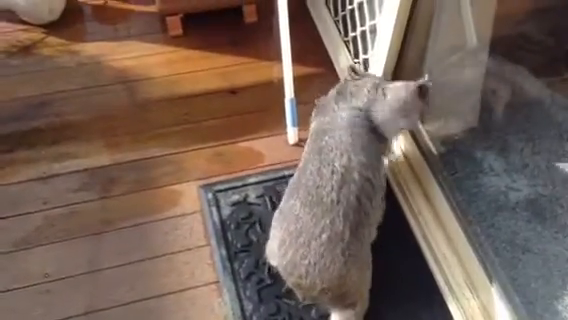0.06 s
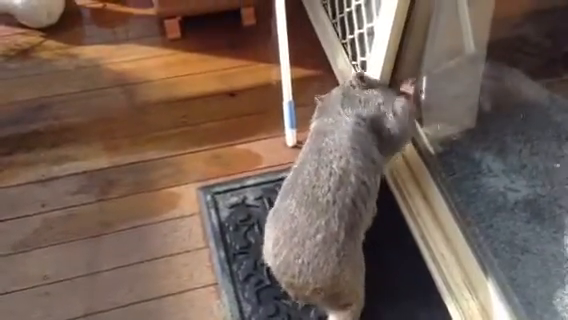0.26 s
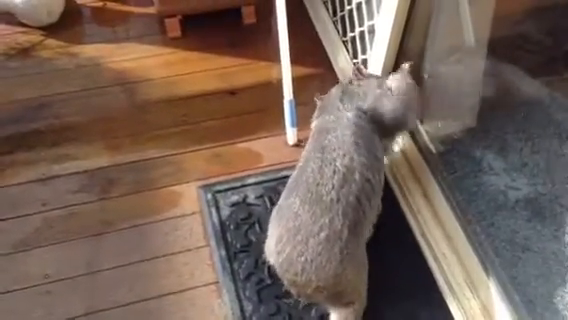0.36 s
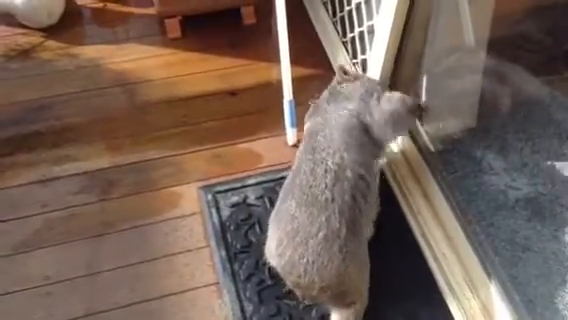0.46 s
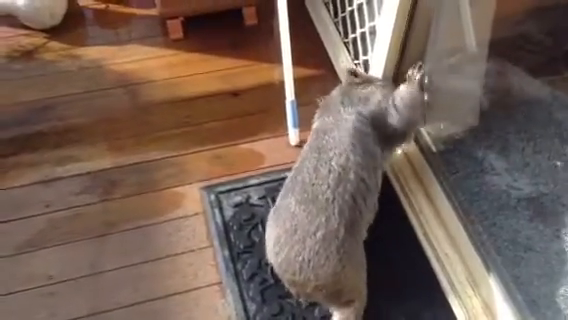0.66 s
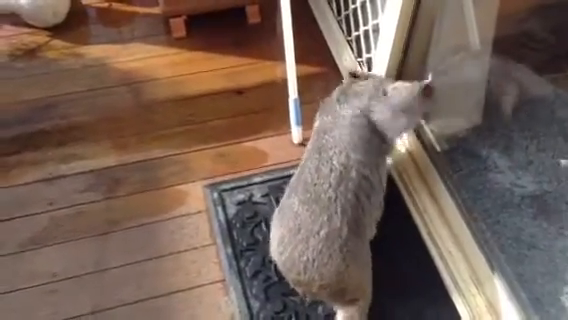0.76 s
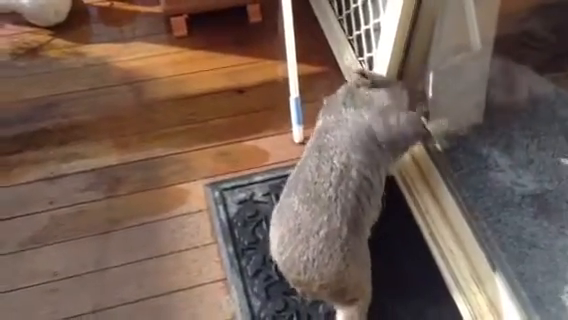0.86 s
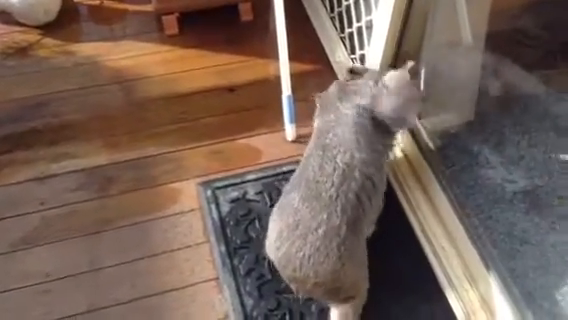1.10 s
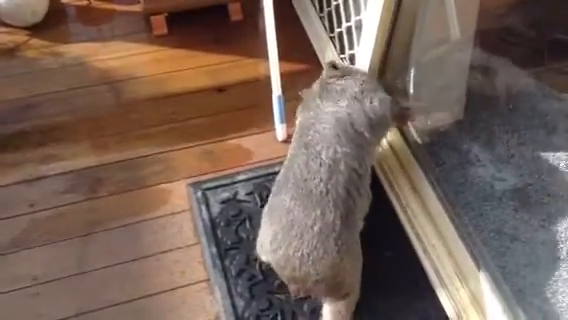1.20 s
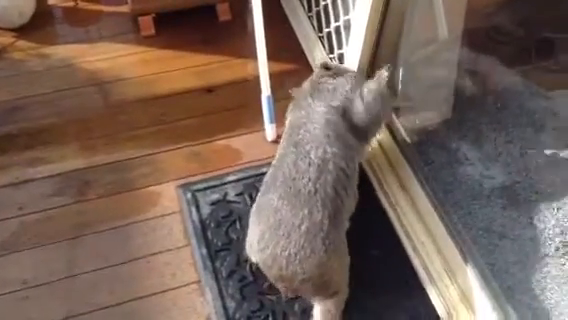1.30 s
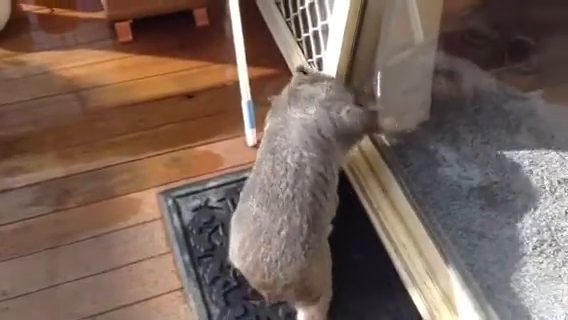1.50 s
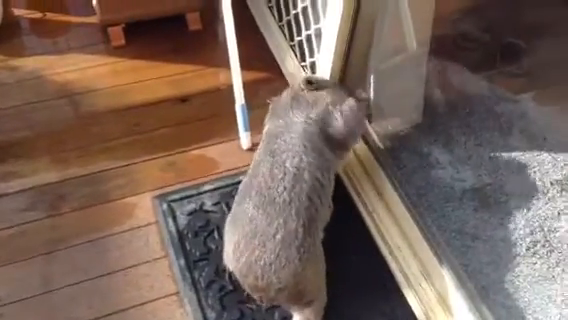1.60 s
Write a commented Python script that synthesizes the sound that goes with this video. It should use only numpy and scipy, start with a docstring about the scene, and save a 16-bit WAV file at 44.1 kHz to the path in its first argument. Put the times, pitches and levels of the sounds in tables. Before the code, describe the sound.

An animal's claws tick and scuff against a sliding door on a verandah. Dull bumps and low rumble, like wind on the microphone, come early. One scrape turns into a short shrill squeak, then more clicks follow over faint hiss.

```python
"""On a wooden verandah, a wombat paws at a sliding door. Claw impacts excite the frame's modes as ticks,
sliding friction scrapes, and one hard stroke breaks into stick-slip oscillation: a short, shrill squeak
that the verandah reflects. Dull, dry bumps and a low rumble, probably turbulent air buffeting the
microphone, come and go over faint outdoor hiss."""
import sys
import numpy as np
from scipy import signal
from scipy.fft import rfft, irfft
from scipy.io import wavfile

SR = 44100
rng = np.random.default_rng(int(sys.argv[2]) if len(sys.argv) > 2 else 0)


def digitize_waveform(pressure):
    """Quantize a signal to 16-bit integers and store it at the path in sys.argv[1].

    Rows of a 2-D input are taken as channels; values are limited to [-1, 1].
    """
    field = np.atleast_2d(pressure).T
    bounded = np.clip(field, -1, 1)
    quanta = np.round(bounded * 32767).astype(np.int16)
    wavfile.write(sys.argv[1], SR, quanta)


N = 72765
TIME, FREQ_HZ = np.arange(N) / SR, np.fft.rfftfreq(N, 1 / SR)


def amp(db):
    """Amplitude ratio: tenfold for every 20 dB."""
    return 10 ** (np.asarray(db) / 20)


def unit(x):
    """Normalisation to an rms of one."""
    return x / np.sqrt(np.mean(x ** 2) + 1e-20)


def read(points, hz):
    """Interpolation on a logarithmic frequency axis."""
    point_hz, value = np.transpose(points)
    return np.interp(np.log(hz + 1), np.log(point_hz + 1), value)


def add(mix, start_s, sound):
    """Superposition of a delayed sound on the mix."""
    part = mix[max(round(start_s * SR), 0):][:len(sound)]
    part += sound[:len(part)]


def colour(x, spectrum, tilt_db=0, size=2048):
    """Minimum-phase filtering at unit energy; the spectrum tilts by tilt_db per octave."""
    hz = abs(np.fft.fftfreq(size, 1 / SR))
    gain = amp(read(spectrum, hz) + tilt_db * np.log2(np.maximum(hz, spectrum[0][0])))
    response = np.exp(signal.hilbert(np.log(gain)).conj())
    taps = np.fft.ifft(response).real[:size // 2]
    return signal.fftconvolve(x, taps / np.linalg.norm(taps))


def noise(spectrum):
    """Spectral shaping of white noise."""
    return unit(irfft(rfft(rng.standard_normal(N)) * amp(read(spectrum, FREQ_HZ)), N))


def wander(hz):
    """Low-pass random fluctuation up to about hz."""
    return unit(irfft(rfft(rng.standard_normal(N)) * np.exp(-(FREQ_HZ / hz) ** 2), N))


# claw impacts on the door: start_s, level_db, tilt_db_per_octave, ping_hz
CLAW_STRIKES = [(0.0511, -33.5, 4, 3640), (0.0616, -38.5, 0, 4150), (0.0638, -44, -2, 3630),
                (.0753, -39.5, 3, 3500), (0.1898, -39, -0.5, 4000), (.197, -43, 12, 2550),
                (0.4155, -41, 6, 4980), (0.414, -31, -0.5, 3540), (0.434, -39, 1, 3560),
                (0.454, -46.5, -1, 4100), (.583, -48.5, 2.5, 4000), (0.765, -30, 0.5, 5040),
                (0.7678, -32, 3, 3710), (0.771, -31.5, -2, 2480), (.7875, -42.5, 21, 3600),
                (.8055, -42, 4, 3640), (.899, -43.5, -3, 3440), (1.046, -41.5, -3.5, 3860),
                (1.0523, -38.5, 0, 3320), (1.1095, -33.5, 0.5, 5090), (1.1128, -38, -1, 3510),
                (1.117, -40.5, 2, 2500), (1.1262, -41.5, 4, 3700), (1.139, -41.5, 2, 3720),
                (1.19, -46, 6.5, 2340), (1.245, -35.5, -0.5, 3860), (1.254, -44, -4, 2670),
                (1.2945, -47.5, 5, 3680), (1.4492, -21.5, 0, 3226), (1.4550, -29, -6.5, 2510),
                (1.4648, -58, 1, 3700), (1.507, -42.5, -5, 2230), (1.522, -47, -8, 3300),
                (1.536, -53, 5, 3200), (1.5605, -43, -6.5, 2300), (1.6042, -56, 3, 4000)]
# spectrum of claw or paw contact: frequency_hz, level_db
CONTACT_SPECTRUM = [(50, -51), (200, -25.5), (600, -11.5), (1000, -3), (1400, -12.5), (2000, -2),
                    (2600, -3), (3000, -1.5), (3600, 1.5), (4500, -3), (6500, -9), (9000, -13.5),
                    (13000, -21.5), (15500, -25.5)]
# normal modes of the frame: frequency_hz, level_db, t60_s
FRAME_MODES = [(2407, -12.5, 0.055), (2660, -14.5, 0.063), (3460, -9.5, .02), (3660, -8, 0.013)]


def claw_ticks(gain_db=2.5, grit_fade_s=0.00081, ping_db=-2, ping_t60_s=0.012, frame_db=-8):
    """Impact excitation: each gritty contact starts a local ping and the frame's damped modes."""
    out, t = np.zeros(N), np.arange(SR // 16) / SR
    for start_s, level_db, tilt_db, ping_hz in CLAW_STRIKES:
        grit = rng.choice([-1., 1.], len(t)) * np.exp(-t / grit_fade_s)
        tick = colour(grit, CONTACT_SPECTRUM, tilt_db)[:len(t)]
        ping = amp(ping_db - 60 * t / ping_t60_s) * np.sin(2 * np.pi * ping_hz * t)
        frame = sum(amp(db - 60 * t / t60_s) * np.sin(2 * np.pi * (hz * t + rng.random()))
                    for hz, db, t60_s in FRAME_MODES)
        add(out, start_s, amp(level_db + gain_db) * (tick + ping + amp(frame_db) * frame))
    return out


def stick_slip(envelope, harmonics_db, first_hz, settled_hz, settle_s, jitter, flutter=0.4):
    """Self-excited friction oscillation: the tone glides onto its mode and is roughest when loud."""
    time_s, level_db = np.transpose(envelope)
    level = amp(np.interp(TIME, time_s, level_db))
    roughness = (level / level.max()) ** 0.27
    age = np.maximum(TIME - time_s[0], 0)
    pitch_hz = settled_hz + (first_hz - settled_hz) * np.exp(-age / settle_s)
    cycles = np.cumsum(pitch_hz * (1 + jitter * roughness * wander(hz=500))) / SR
    tone = sum(amp(db) * np.sin(2 * np.pi * k * cycles) for k, db in enumerate(harmonics_db, 1))
    sounding = (TIME > time_s[0]) & (TIME < time_s[-1])
    return tone * level * sounding * (1 + flutter * roughness * wander(hz=500))


# envelope of the main squeak: time_s, level_db
SQUEAK_ENVELOPE = [(.646, -55), (.65, -48), (.661, -54), (.665, -21.5), (.675, -25.5), (.682, -32),
                   (.695, -52), (.71, -44), (.735, -54), (.762, -52)]
# its harmonics, from the fundamental up: level_db
SQUEAK_HARMONICS = [1.5, -2, -14.5, -22]
# envelope of the higher mode: time_s, level_db
WHISTLE_ENVELOPE = [(.646, -31), (.649, -24), (.654, -29.5), (.659, -24), (.666, -40), (.68, -38),
                    (.70, -59), (.76, -60), (.85, -70)]


def squeak():
    """Stick-slip of a claw drives two modes; the higher one peaks first."""
    main = stick_slip(SQUEAK_ENVELOPE, SQUEAK_HARMONICS,
                      first_hz=3640, settled_hz=3460, settle_s=0.018, jitter=0.019)
    whistle = stick_slip(WHISTLE_ENVELOPE, [0],
                         first_hz=7750, settled_hz=8100, settle_s=0.004, jitter=0.009)
    return main + whistle


# spectrum of the hard stroke: frequency_hz, level_db
SCRAPE_SPECTRUM = [(200, -2), (600, -3.5), (1150, 3), (1500, -4), (2100, -5.5), (2700, 1), (3600, -10),
                   (4600, -14.5), (6000, -10.5), (8000, -18), (11000, -20.5), (15000, -31)]


def scrape(start_s=0.6236, level_db=-23, impact_fade_s=0.0056, drag_db=-15.5, drag_s=0.061):
    """Impact, then sliding friction: the paw lands hard and drags into the squeak."""
    out, t = np.zeros(N), np.arange(SR // 5) / SR
    envelope = np.exp(-t / impact_fade_s) + amp(drag_db) * np.exp(-(t / drag_s) ** 2)
    add(out, start_s, amp(level_db) * colour(envelope * rng.standard_normal(len(t)), SCRAPE_SPECTRUM))
    return out


# paw slides along the door: start_s, rise_s, fade_s, level_db
PAW_SLIDES = [(.125, 0.011, 0.069, -59), (0.51, 0.0085, 0.048, -53), (.6, 0.011, 0.023, -54.5),
              (1.218, 0.0095, 0.032, -55.5), (1.515, 0.024, 0.033, -62.5)]


def paw_rubs():
    """Light sliding friction radiates soft swells of noise."""
    envelope = np.zeros(N)
    for start_s, rise_s, fade_s, level_db in PAW_SLIDES:
        rise = np.clip((TIME - start_s) / rise_s, 0, 1)
        fade = np.exp(-np.maximum(TIME - start_s - rise_s, 0) / fade_s)
        envelope += amp(level_db) * rise * fade
    return envelope * noise(CONTACT_SPECTRUM)


# reverberation time under the roof: frequency_hz, t60_s
VERANDAH_DECAY = [(300, 0.16), (1500, 0.26), (3500, .32), (8000, 0.33), (15000, 0.48)]


def verandah(x, early_db=-1.5, early_fade_s=0.011, tail_db=-8):
    """Reverberation: early reflections from deck and wall, then a short diffuse tail."""
    t = np.arange(SR // 2) / SR
    signs = rng.choice([-1., 1.], (2, len(t)))
    arrivals = (rng.random((2, len(t))) < 0.08) & (t > 0.002)  # sparse, after a 2 ms gap
    early_taps, tail_taps = signs * arrivals
    early = early_taps * np.exp(-t / early_fade_s)
    hz, age, bands = signal.stft(tail_taps, SR, nperseg=256)
    decay = amp(-60 * age / read(VERANDAH_DECAY, hz)[:, None])
    tail = signal.istft(bands * decay, SR, nperseg=256)[1][:len(t)]
    response = amp(early_db) * early / np.linalg.norm(early) + amp(tail_db) * tail / np.linalg.norm(tail)
    return signal.fftconvolve(x, response)[:N]


# pressure pulses of the air: centre_s, level_db, pitch_hz
AIR_PULSES = [(0.0904, -26.5, 167), (0.1107, -31.5, 252), (0.198, -27.5, 353), (0.2167, -12, 197),
              (0.2492, -11.5, 523), (.2630, 0.5, 400), (0.275, -33, 292), (.288, -16, 247),
              (.305, -17.5, 475), (0.3242, -9.5, 236), (.329, -4.5, 453), (0.3325, -2, 328),
              (0.3649, -14.5, 750), (0.368, -7.5, 395), (0.3839, -11, 268), (.3933, -9, 249),
              (0.4047, -15.5, 254), (0.4077, -17.5, 660), (.412, -7.5, 248), (0.425, -23, 240),
              (.436, -16.5, 275), (0.4756, -14.5, 197), (0.4964, -13.5, 266), (.5392, -25.5, 490),
              (0.5439, -12.5, 218), (0.603, -18.5, 253), (0.6366, -16, 245), (0.645, -16.5, 210),
              (0.6607, -9, 298), (0.6709, -10, 239), (0.6874, -3.5, 290), (.695, -10, 380),
              (0.7108, -8, 340), (0.715, -15.5, 556), (0.7227, -9.5, 246), (0.7476, -22, 398),
              (0.7571, -12.5, 307), (0.7672, -6, 199), (0.9329, -24.5, 245), (0.9542, -23.5, 240),
              (0.9892, -26, 200), (1.1512, -22, 148), (1.1871, -20, 251)]


def air_bumps(gain_db=-0.5, width_cycles=0.29, bass_cut_hz=115):
    """Buffeting: pressure swings of a cycle or two, without resonance or deep bass."""
    pressure = np.zeros(N)
    for centre_s, level_db, pitch_hz in AIR_PULSES:
        cycles = np.clip((TIME - centre_s) * pitch_hz, -20, 20)
        pressure -= amp(level_db + gain_db) * np.cos(2 * np.pi * cycles) / np.cosh(cycles / width_cycles)
    slope = (FREQ_HZ / bass_cut_hz) ** 2  # second-order high-pass
    return irfft(rfft(pressure) * slope / np.hypot(1, slope), N)


# dry edges among the bumps: start_s, level_db, tilt_db_per_octave
CRACKLES = [(.2620, -22.5, -1), (0.3305, -28.5, -5), (0.3639, -40, -5), (0.4085, -37, -6),
            (0.4902, -30, -4.5)]
# their spectrum: frequency_hz, level_db
CRACKLE_SPECTRUM = [(150, -31), (600, 5), (1300, 0.5), (2500, -14.5), (5000, -17), (9000, -30),
                    (15000, -38)]


def crackles(fade_s=0.0015):
    """Broadband transients: very short noise bursts give some bumps a dry edge."""
    out, t = np.zeros(N), np.arange(SR // 50) / SR
    for start_s, level_db, tilt_db in CRACKLES:
        burst = rng.choice([-1., 1.], len(t)) * np.exp(-t / fade_s)
        add(out, start_s, amp(level_db) * colour(burst, CRACKLE_SPECTRUM, tilt_db))
    return out


# strength of the turbulence: time_s, level_db
RUMBLE_ENVELOPE = [(0, -55.5), (.07, -52), (.095, -41), (.135, -52), (.185, -56), (.215, -26), (.24, -30),
                   (.275, -16), (.297, -34), (.32, -18.5), (.355, -25), (.38, -19), (.42, -20),
                   (.455, -34.5), (.51, -26), (.585, -34), (.68, -19.5), (.74, -30), (.775, -28),
                   (.825, -40), (.87, -44.5), (.96, -40.5), (1.015, -54.5), (1.125, -51.5), (1.15, -48),
                   (1.2, -33.5), (1.27, -45), (1.32, -57.5), (1.52, -81), (1.58, -45.5), (1.65, -58)]
# spectra of its low body and its brighter rasp: frequency_hz, level_db
RUMBLE_SPECTRUM = [(25, -51), (60, -50), (90, -14.5), (125, -1.5), (190, 4), (280, -2.5), (400, -15.5),
                   (600, -21.5), (900, -46), (1500, -71), (3000, -85)]
RASP_SPECTRUM = [(100, -17), (350, 5), (550, 0), (850, -12.5), (1250, -21.5), (1800, -30), (4000, -75)]


def air_rumble(lump_db=1.72, lump_hz=59.5, rasp_db=-31.5, rasp_growth=1.36, reference_db=-21):
    """Turbulent pressure fluctuation: lumpy low noise that brightens as it strengthens."""
    level_db = np.interp(TIME, *np.transpose(RUMBLE_ENVELOPE)) + lump_db * wander(lump_hz)
    body = amp(level_db) * noise(RUMBLE_SPECTRUM)
    rasp = amp(rasp_db + rasp_growth * (level_db - reference_db)) * noise(RASP_SPECTRUM)
    return body + rasp


# outdoor background spectrum: frequency_hz, level_db
HISS_SPECTRUM = [(25, -34), (100, -2.5), (250, 7.5), (500, 3.5), (1000, 1), (2000, -7), (4000, -11),
                 (8000, -13), (14000, -13), (16000, -27)]


def outdoor_hiss(level_db=-53):
    """Stationary broadband noise forms the ambient floor."""
    return amp(level_db) * noise(HISS_SPECTRUM)


def scene(tick_reflection=0.6):
    """Superposition: the door sounds with their reflections, the air and hiss without."""
    squeal = squeak()
    ticks = claw_ticks()
    friction = paw_rubs() + scrape() + squeal
    door = ticks + friction + verandah(tick_reflection * ticks + friction)
    return (door + air_bumps() + crackles() + air_rumble() + outdoor_hiss())[None]


def record(dry, ceiling=0.74, cutoff_hz=15700):
    """Soft saturation rounds the tallest peaks; a low-pass filter limits the band."""
    rounded = dry / (1 + (dry / ceiling) ** 8) ** (1 / 8)
    low_pass = signal.firwin(301, cutoff_hz, window=("kaiser", 9), fs=SR)
    return signal.oaconvolve(rounded, low_pass[None], "same")


dry = scene()
out = record(dry)
digitize_waveform(out)
```